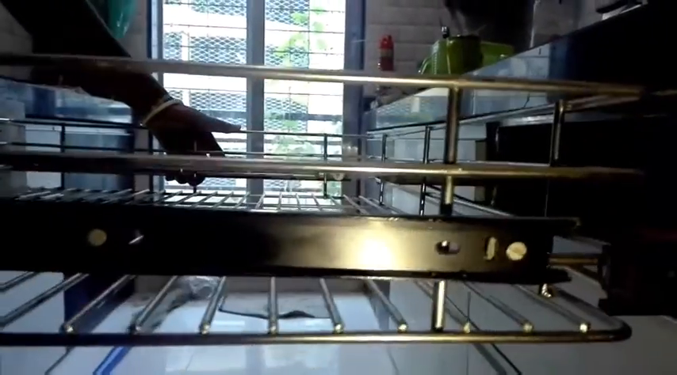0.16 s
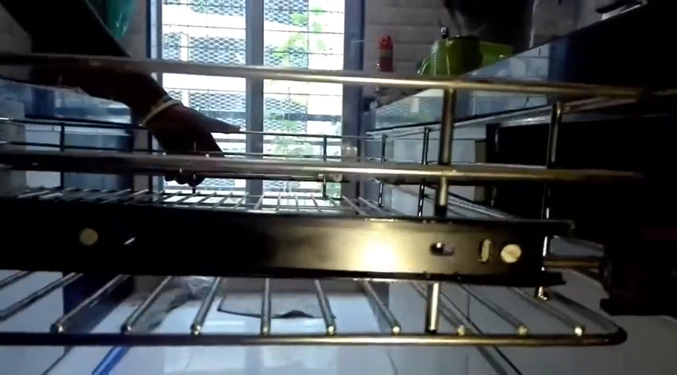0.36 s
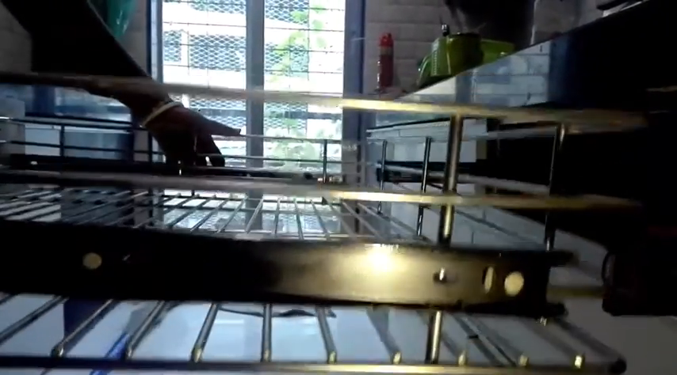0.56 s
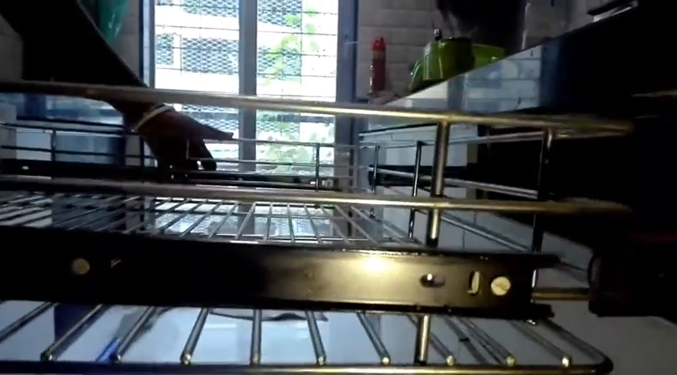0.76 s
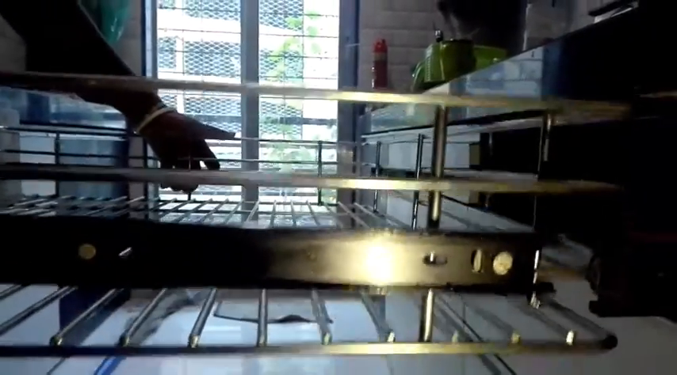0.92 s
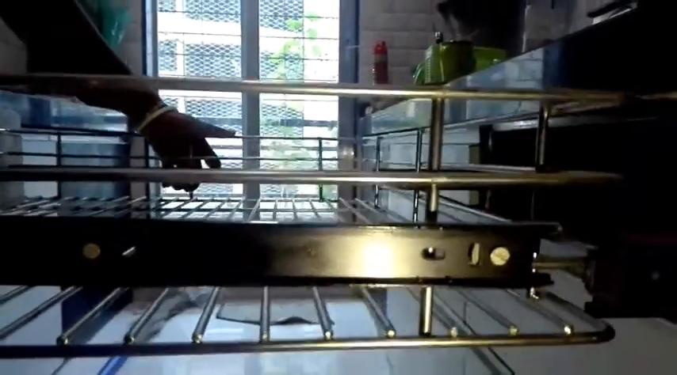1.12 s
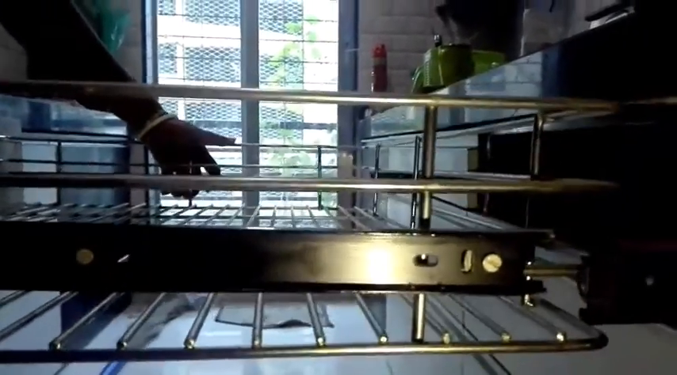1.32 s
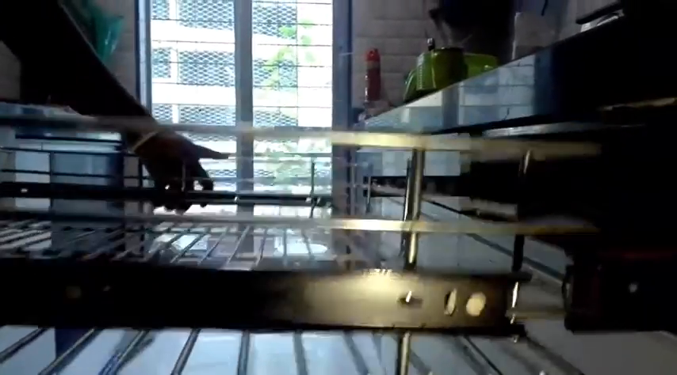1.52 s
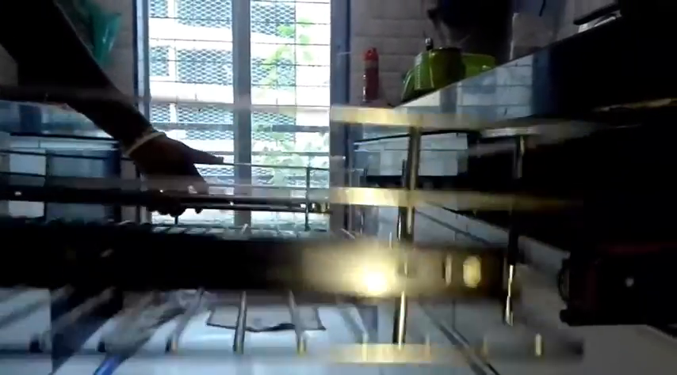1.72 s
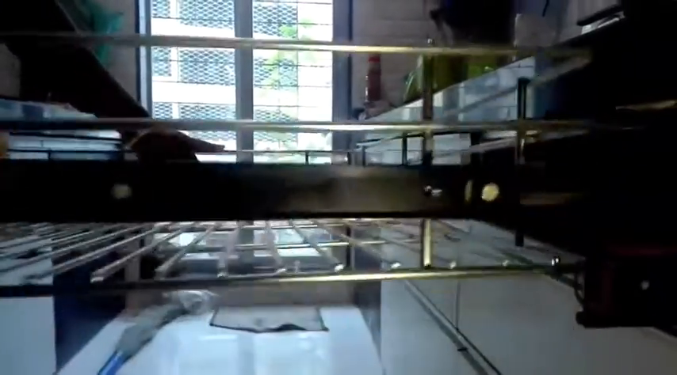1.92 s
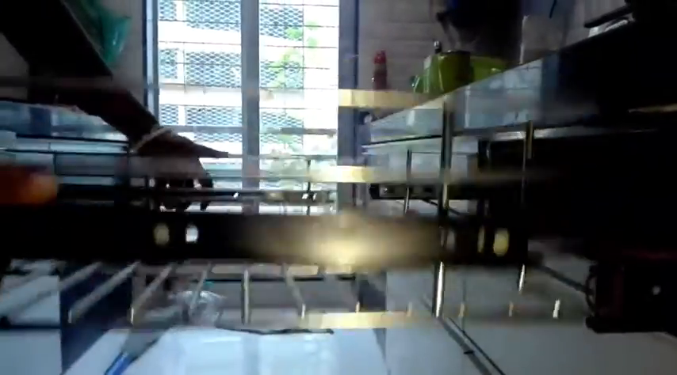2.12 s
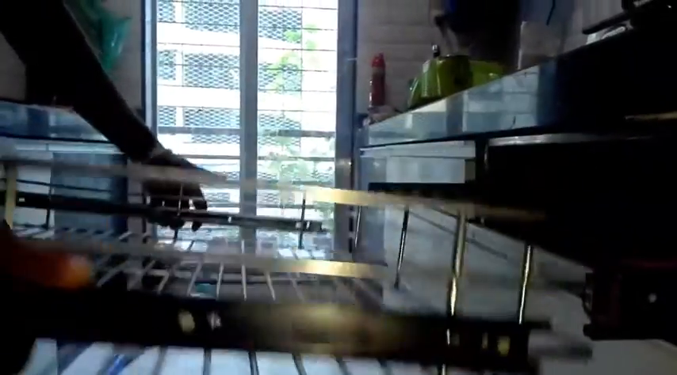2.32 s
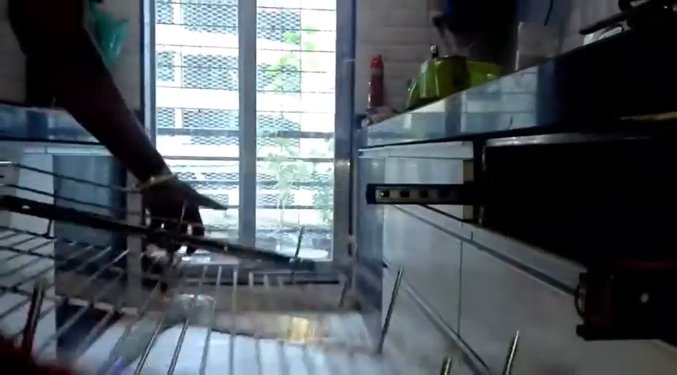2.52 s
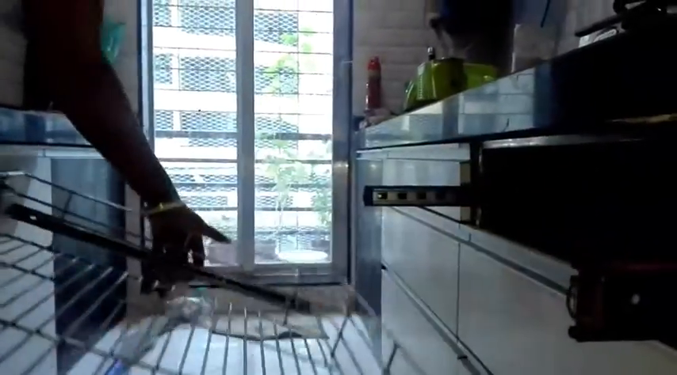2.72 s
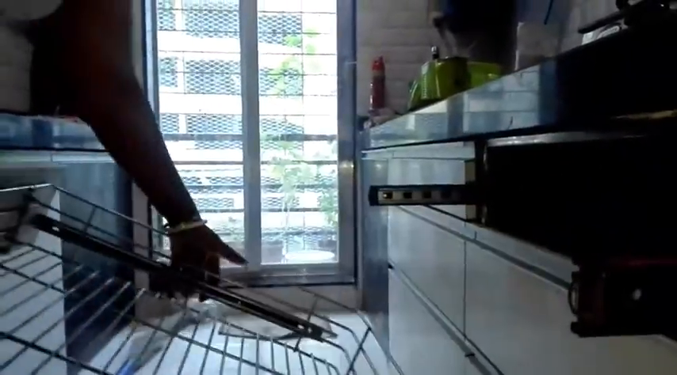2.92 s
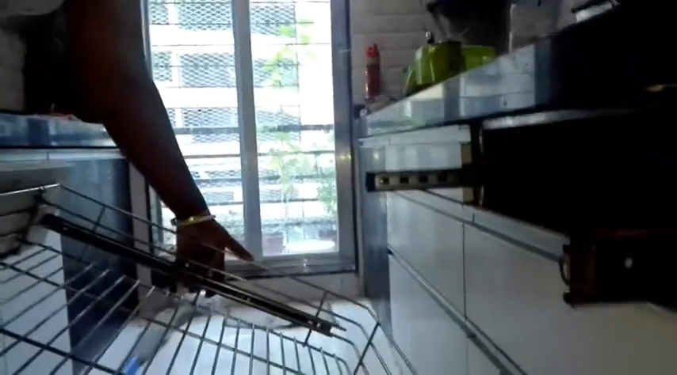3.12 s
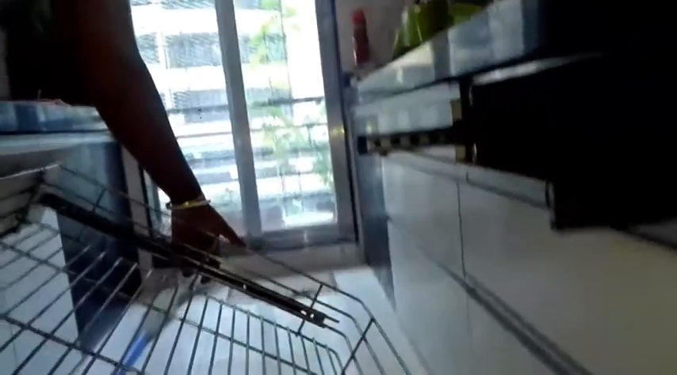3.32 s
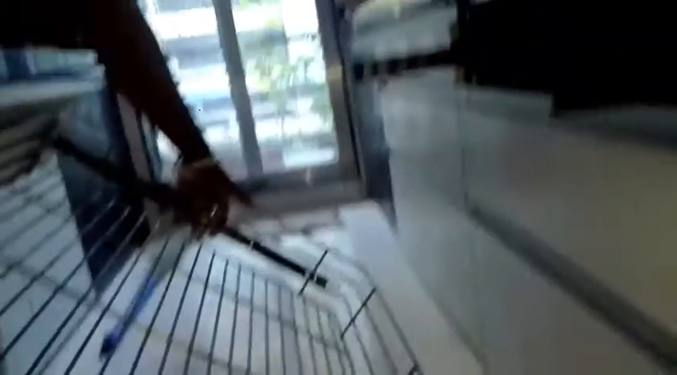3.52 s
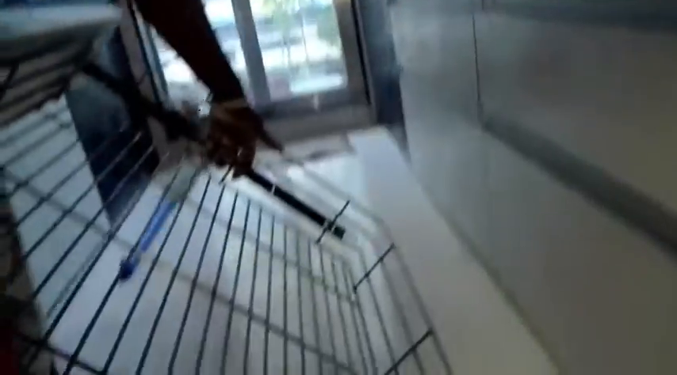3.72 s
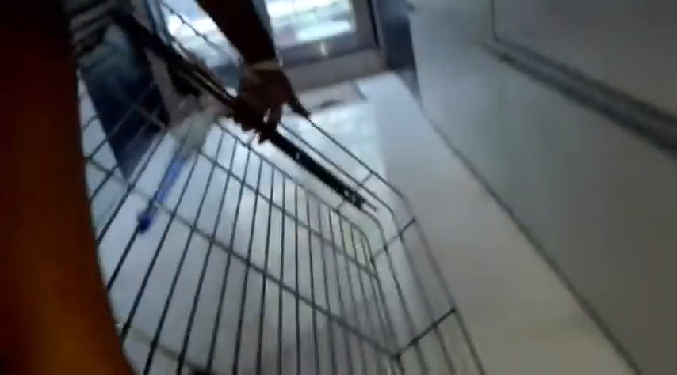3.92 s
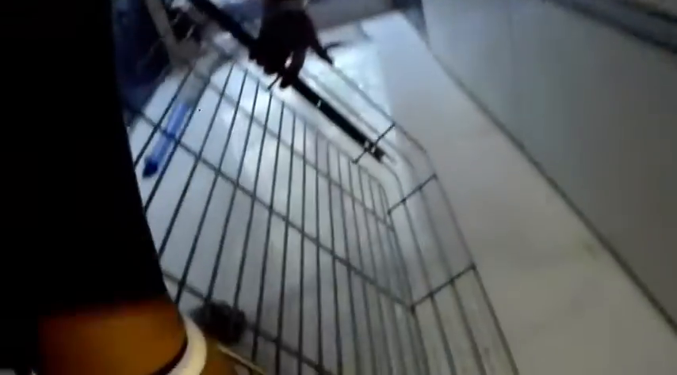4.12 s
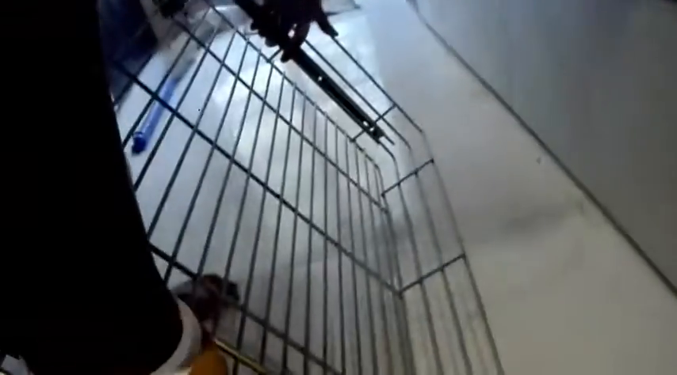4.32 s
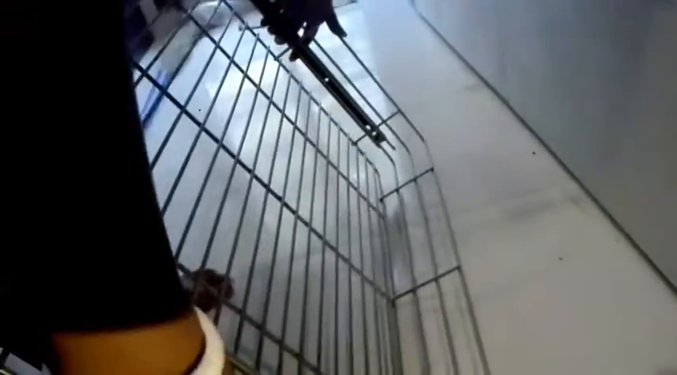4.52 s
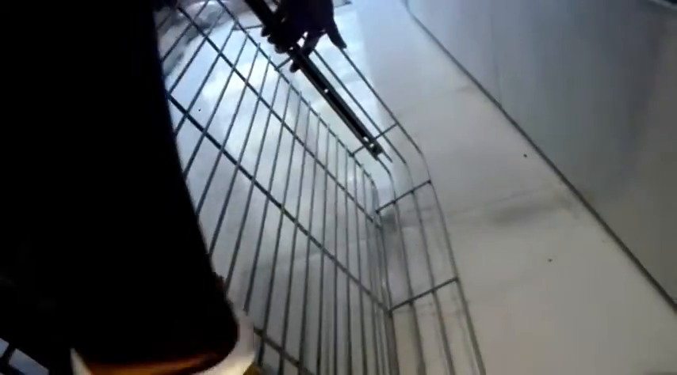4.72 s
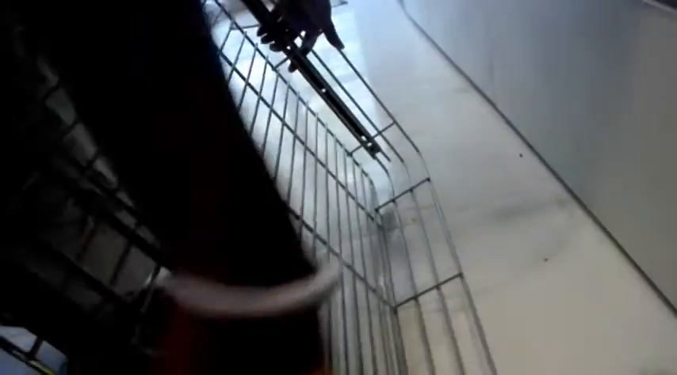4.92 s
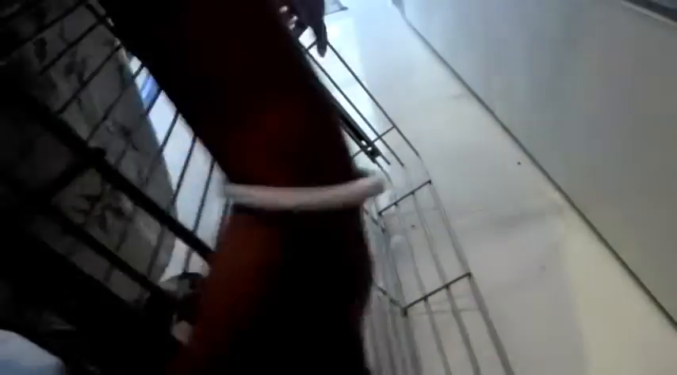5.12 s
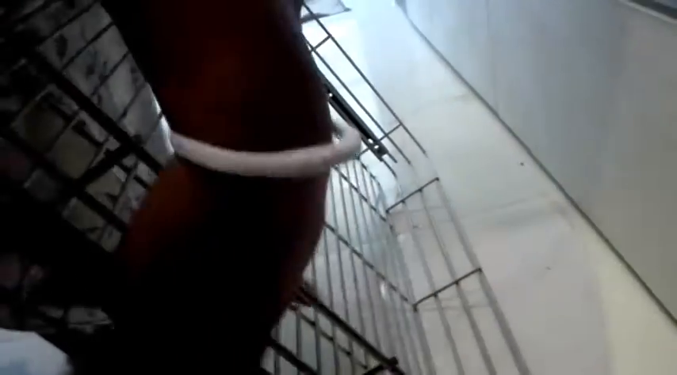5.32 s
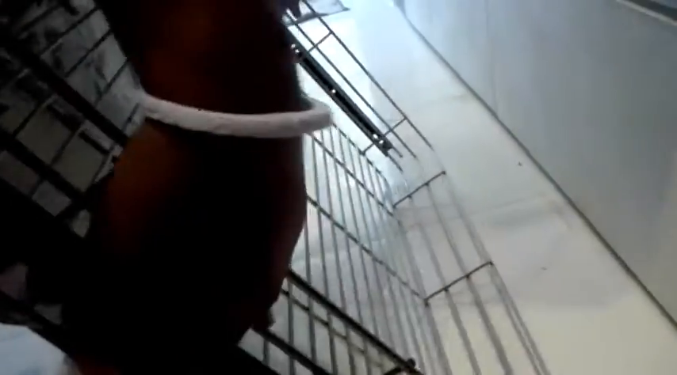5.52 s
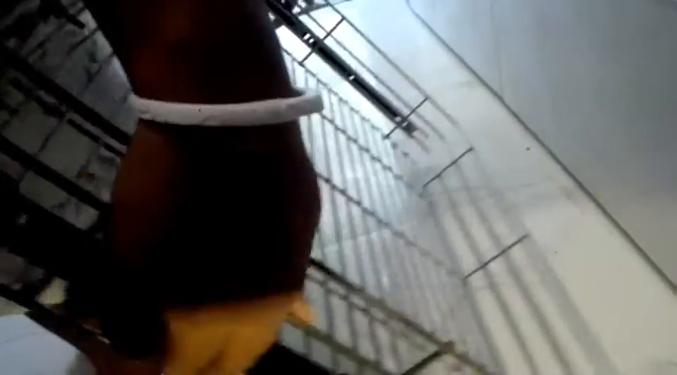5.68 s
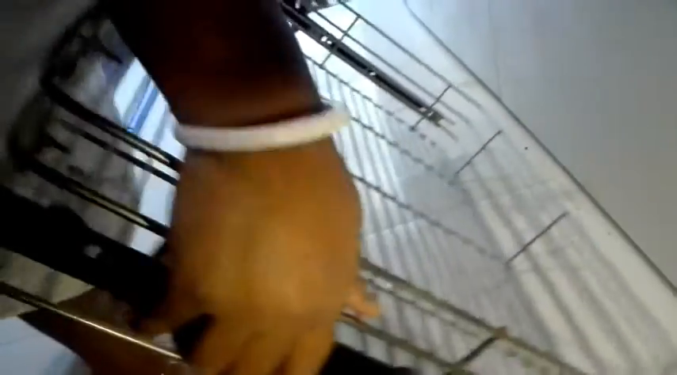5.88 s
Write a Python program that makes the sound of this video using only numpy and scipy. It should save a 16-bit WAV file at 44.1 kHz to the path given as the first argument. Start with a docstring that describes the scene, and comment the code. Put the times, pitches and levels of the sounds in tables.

```python
"""A wire basket is worked off its drawer slides, close by in a small, hard-walled kitchen.
Over steady air noise and hum, hands brush the wires. From 0.7 to 2.2 s jolts rattle the wires and
wobble the frame, catches snap, the slides bump the cabinet, slipping metal squeaks, single wires ring.
Dull taps follow as the basket is carried. At 4.6 s it lands on the floor tiles and rocks.
Near 5.9 s metal rubs on metal: a short scrape with hiss, squeal and drone."""
import sys
import numpy as np
from scipy import signal
from scipy.fft import rfft, irfft, next_fast_len
from scipy.io import wavfile
from scipy.ndimage import uniform_filter1d, map_coordinates

SR = 44100
rng = np.random.default_rng(int(sys.argv[2]) if len(sys.argv) > 2 else 0)


def dump(signal):
    """Clip the signal to [-1, 1] and save it as 16-bit WAV at the path in sys.argv[1]."""
    limited = np.clip(np.atleast_2d(signal).T, -1, 1)
    pcm = np.round(limited * 32767).astype(np.int16)
    wavfile.write(sys.argv[1], SR, pcm)


N = 262395
TIME_S = np.arange(N) / SR
AGE_S = TIME_S[:SR]  # time since an onset

# background air spectrum: freq_hz, gain_db
AIR_COLOUR = [(15, -52), (25, -5.5), (99, 0.5), (156, -11), (178, -9.5), (344, -15.5), (381, -19),
              (603, -26.5), (1110, -15), (1850, -16.5), (2100, -18.5), (2580, -24.5), (3500, -19.5),
              (4700, -25), (5150, -22.5), (5600, -27), (8750, -32), (11000, -56), (14300, -75),
              (22000, -120)]
# shifts of grip: peak_s, half_length_s, brush_db, flex_db
GRIP_SHIFTS = [(0.005, 0.066, -69.5, -49.5), (1.448, 0.1, -99, -54), (2.896, 0.081, -72, -75),
               (3.757, 0.099, -71, -60.5), (3.957, 0.046, -81.5, -54), (4.087, 0.076, -69.5, -69),
               (5.367, 0.13, -66, -56), (5.63, 0.11, -72, -63.5)]
# spectrum of skin on wire: freq_hz, gain_db
SKIN_COLOUR = [(1000, -17), (3000, -12.5), (6000, 6), (9000, 14), (11500, 8), (14500, -4)]
# frame bending modes: pitch_hz, gain_db
FRAME_MODES = [(44, -8.5), (68, -5), (92, -2), (108, -17), (127, -3), (153, -4.5), (195, -13.5),
               (263, -12.5), (325, -15)]
# jolts in the slides: start_s, rattle_db, graze_lead_s, fall_s, tilt_db_per_oct, low_mid_db,
# clang_db, clang_centre_hz, frame_db, frame_centre_hz, frame_range_oct
SLIDE_JOLTS = [(.684, -49.5, 0.0016, 0.024, 0, 15.5, -54.5, 1350, -48.5, 122, 0.37),
               (1.102, -49, 0.0012, 0.033, 0.5, 20.5, -65.5, 3300, -45.5, 147, 0.49),
               (1.672, -26, 0.0083, 0.015, 1.5, 1.5, -32, 1200, -42, 141, 0.52),
               (1.697, -31.5, 0.001, 0.028, -5, 3.5, -33, 1250, -46, 138, 0.33),
               (1.768, -45.5, 0.0002, .035, -2, 16, -52, 2795, -53, 150, 0.55),
               (1.826, -41.5, 0.0021, 0.074, -0.5, 16.5, -43.5, 1700, -50, 200, 0.78),
               (1.92, -21, .032, 0.012, 2.5, -1, -23, 2200, -35.5, 115, 0.52),
               (1.935, -26, 0.0015, 0.0083, 4.5, -19, -21, 3500, -39, 130.3, 0.37),
               (1.976, -35.5, 0, 0.046, 3.5, 20, -47, 1350, -44.5, 88, 0.3)]
# rattle spectrum in the slides: freq_hz, gain_db
HANGING_COLOUR = [(60, -7), (200, -6), (400, -3), (520, -10.5), (680, -3.5), (950, 5), (1400, 4),
                  (2300, 2.5), (3400, 3.5), (4000, -2.5), (4500, -3), (5800, -3), (8000, -7), (11000, -8.5),
                  (14500, -17)]
# wire modes in the slides: pitch_hz, gain_db, t60_s
HANGING_MODES = [(787, -7.5, 0.38), (957, -3.5, 0.18), (1019, -6, 0.21), (1200, -2.5, .28),
                 (1310, -6.5, 0.89), (1365, -3, .55), (1430, 0.5, 0.299), (1664, -8.5, .22),
                 (1784, -7.5, 0.14), (2097, -4.5, 0.1583), (2270, -3, .18), (2606, 7, 0.14),
                 (2850, -1, .12), (3026, 7, 0.15), (3253, 2, 0.18), (3520, 1, 0.142), (3580, 1, 0.12),
                 (3893, 5.5, .11), (4650, -3, 0.099), (5007, -1.5, 0.13), (5800, -1.5, 0.15),
                 (6150, -1, .14), (6250, 0, .12), (7420, -9, 0.15), (11300, -5, .12)]
# catches letting go: start_s, level_db, fall_s, tilt_db_per_oct, ring_vs_crack_db, ring_shift_oct
CATCH_SNAPS = [(.702, -43, 0.0045, 9, 8, -0.0088), (1.1087, -30.5, 0.0032, 3.5, -4, -0.034),
               (1.6604, -12, 0.0028, 1, -22.5, -0.043), (1.8999, -15.5, 0.0037, -8, -3.5, -0.099),
               (1.9239, -16, 0.00097, -12, -18, -.13)]
# crack spectrum: freq_hz, gain_db
CRACK_COLOUR = [(200, -43.5), (1500, -46), (2800, -12), (4000, 5.5), (6000, 7), (9000, 2), (11500, -1.5),
                (14500, -6.5)]
# steel rail modes: pitch_hz, gain_db, t60_s
RAIL_MODES = [(4436, -11.5, .15), (5100, -4.5, 0.2), (5800, -13, 0.131), (6390, 0.5, 0.15), (6680, 6, 0.18),
              (6780, 3, 0.25), (8400, -15.5, 0.25), (9600, -3, 0.2), (10500, -2, 0.16), (11060, -0.5, 0.15),
              (12350, -4.5, .1), (14300, -8.5, 0.09)]
# slides hitting the cabinet: start_s, level_db, centre_hz
CABINET_BUMPS = [(.705, -53, 930), (.74, -49.5, 315), (1.113, -43, 950), (1.118, -51, 420),
                 (1.2, -52.5, 270), (1.668, -39, 700), (1.688, -29.5, 265), (1.71, -35.5, 400),
                 (1.828, -42.5, 950), (1.85, -42.5, 400), (1.904, -28, 950), (1.921, -23.5, 419),
                 (1.975, -40, 720), (2.034, -36, 250)]
# cabinet panel modes: pitch_hz, gain_db, t60_s
PANEL_MODES = [(265.6, -1.5, 0.18), (322.5, -7.5, 0.15), (394, 1.5, 0.18), (610, -11.5, .07),
               (792, -11.5, .12), (947, 1.5, 0.1306), (990, -7, 0.075)]
# stick-slip squeaks: start_s, length_s, level_db, pitch_hz, glide_oct
WIRE_SQUEAKS = [(1.653, 0.0048, -32.5, 5600, -0.34), (1.656, 0.0076, -34, 4100, -0.33),
                (1.958, 0.0079, -55, 870, -0.037), (4.819, 0.023, -48, 3800, -0.0063),
                (4.819, 0.009, -42, 7150, -0.011), (4.8188, 0.015, -35.5, 8840, 0.021),
                (4.8185, 0.014, -34.5, 10500, 0.047), (4.819, 0.0081, -43, 11450, 0.013)]
# single wires struck: start_s, level_db, centre_hz
WIRE_PINGS = [(1.68, -33.5, 3200), (1.684, -38, 1320), (1.836, -49, 3050), (1.924, -25.5, 3150),
              (1.927, -35, 1420), (1.934, -23, 3680), (1.984, -38, 1707), (1.99, -38, 3250),
              (2.089, -44, 1330), (2.1, -49, 3230), (2.19, -50, 1170), (4.643, -32.5, 3653),
              (4.842, -26.5, 3230), (4.844, -32.5, 900), (4.856, -31.5, 1790), (4.872, -28, 3530),
              (4.978, -42, 1400), (4.984, -34.5, 1830)]
# taps while carried: start_s, level_db, swell_s, centre_hz
CARRY_TAPS = [(2.578, -54.5, 0.011, 1780), (3.366, -51, 0.014, 1640), (3.941, -63, 0.011, 3000),
              (4.088, -64, 0.033, 1850)]
# landing and rocking on tiles: columns as SLIDE_JOLTS
FLOOR_KNOCKS = [(4.639, -36, 0.0009, 0.031, 0.5, -4.5, -40, 1350, -47.5, 144, 0.5),
                (4.84, -25.5, 0.00091, 0.019, 3, 3, -36, 2700, -36.5, 144, 0.57),
                (4.86, -33.5, 0, 0.031, -1, -8, -30.5, 2400, -35.5, 147, 0.4),
                (4.924, -40.5, 0.00016, 0.013, 1, -9, -44, 1500, -49, 256, 0.3),
                (4.972, -37, 0.0033, 0.03, -4.5, 2, -41.5, 1500, -47.5, 91.5, 0.44),
                (5.11, -52.5, 0.0018, 0.063, -7, 15, -51, 1400, -60.5, 96, 0.27)]
# rattle spectrum on the floor: freq_hz, gain_db
FLOOR_COLOUR = [(60, -2), (200, -4), (310, -12), (430, -3), (560, -6), (740, -2), (880, -5.5), (1080, 1),
                (1400, 4.5), (1900, 1.5), (2600, -2.5), (3500, 2), (4300, 0), (5000, -2.5), (7100, -7),
                (10500, -9), (14500, -30)]
# wire modes of the free basket: pitch_hz, gain_db, t60_s
FREE_MODES = [(899, -3, 0.14), (1225, -3, .25), (1314, 2, .36), (1408, 0, 0.3), (1530, 0.5, 0.32),
              (1663, -7.5, 0.18), (1786, 4, .3), (2117, -1.5, 0.5), (2300, 4.5, 0.24), (3186, 4.5, 0.13),
              (3285, 4, .16), (3510, 8, 0.15), (3530, 6.5, 0.14), (3690, 7, 0.15), (4190, 1, 0.28),
              (5660, -13, .2), (6960, 3.5, 0.12), (7090, 5, 0.12), (8600, -10, .16), (10500, -1, .12)]
# scrape hiss spectrum: freq_hz, gain_db
HISS_COLOUR = [(600, -69), (1300, -3), (2000, -0.5), (2500, -7), (3100, 7.5), (4200, 1), (5400, 10.5),
               (6600, -0.5), (8500, 3), (10200, 4), (12300, 7), (14500, -4)]
# wires squealing in the scrape: pitch_hz, width_hz, level_db, pressure_exponent
WIRE_SQUEALS = [(3560, 38, -49.5, .2), (3452, 79, -49, 0.43), (4990, 110, -59, 0.52), (5520, 200, -56, 0.7),
                (7400, 62, -62, 0.9), (8500, 220, -60, .8)]
# kitchen decay: freq_hz, t60_s
KITCHEN_DECAY = [(100, 1), (500, 0.67), (1300, 0.52), (3000, 0.17), (7000, 0.3), (10000, 0.22),
                 (12000, 0.18)]
# width of diffuse sound: freq_hz, side_vs_mid_db
STEREO_WIDTH = [(25, -5.5), (60, -22.5), (400, -13.5), (1300, -14), (2400, -13.5), (4400, -12),
                (8000, -4.5), (14000, -5.5)]
# microphone housing notches: centre_hz, width_oct, gain_db
HOUSING_DIPS = [(506, 0.2435, -2), (2410, 0.078, -1.5), (4207, 0.2, -2.5)]


def undb(db):
    """Decibels to gain."""
    return 10 ** (np.asarray(db) / 20)


def unit_rms(x):
    """Scale to rms 1."""
    return x / np.sqrt(np.mean(x ** 2))


def unit_energy(x):
    """Scale to mean energy 1 per channel."""
    return x / np.sqrt(np.mean(np.sum(x ** 2, axis=-1)))


def bins_hz(size):
    """FFT bin frequencies, floored at 1 Hz."""
    return np.maximum(np.fft.rfftfreq(size, 1 / SR), 1)


def curve(points, hz):
    """Interpolate (freq_hz, value) rows over log frequency."""
    freq_hz, value = np.transpose(points)
    return np.interp(np.log(hz), np.log(freq_hz), value)


def band_db(hz, centre_hz, range_oct):
    """Flat-topped band, 3 dB down at range_oct either side."""
    return -10 * np.log10(1 + (np.log2(hz / centre_hz) / range_oct) ** 4)


def response(db_at, size=8192):
    """Minimum-phase, unit-energy impulse response for a dB curve."""
    cepstrum = irfft(np.log(undb(db_at(bins_hz(size)))))
    cepstrum[1:size // 2] *= 2
    cepstrum[size // 2 + 1:] = 0
    return unit_energy(irfft(np.exp(rfft(cepstrum))))


def through(x, impulse):
    """Convolve, keeping the length of x."""
    return signal.fftconvolve(np.atleast_2d(x), np.atleast_2d(impulse), axes=-1)[:, :np.shape(x)[-1]]


def coloured(x, colour):
    """Filter by a (freq_hz, gain_db) table."""
    return through(x, response(lambda hz: curve(colour, hz)))


def spread(mid, side):
    """Mid and side to stereo; width varies with frequency."""
    size = next_fast_len(len(side))
    side = irfft(rfft(side, size) * undb(curve(STEREO_WIDTH, bins_hz(size))), size)[:len(mid)]
    return np.array([mid + side, mid - side])


def add(out, start_s, x):
    """Mix x into out from start_s."""
    start = max(int(start_s * SR), 0)
    out[:, start:start + x.shape[-1]] += x[..., :N - start]


def wander(steps):
    """Random curve with a new Gaussian value at each whole step."""
    return np.interp(steps, np.arange(256), rng.standard_normal(256))


def bell(peak_s, half_length_s):
    """Gaussian swell, peak 1."""
    return np.exp(-((TIME_S - peak_s) / half_length_s) ** 2)


def contacts(size, grain_db, hold_samples=24):
    """Dense tiny collisions: stereo noise whose strength scatters by grain_db."""
    strength = undb(grain_db * rng.standard_normal(size // hold_samples + 1))
    strength = np.repeat(strength, hold_samples)[:size]
    return spread(*unit_rms(strength * rng.standard_normal((2, size))))


def background(air_db=-58, hum_hz=153, hum_db=-66.5):
    """Steady air noise from the flat and window; a faint wavering hum."""
    air = unit_rms(coloured(spread(*rng.standard_normal((2, N))), AIR_COLOUR))
    hum = undb(hum_db + 2.5 * wander(4 * TIME_S)) * np.sin(2 * np.pi * hum_hz * TIME_S)
    flicker_db = .5 * wander(8.8 * TIME_S) + .5 * wander(22 * TIME_S)
    return undb(air_db + flicker_db) * air + hum


def frame(age_s, envelope, centre_hz, range_oct, thud_db=-7, thud_top_hz=330):
    """One band of the frame's bending modes plus a dull thud, each under envelope(hz)."""
    mode_hz, mode_db = np.transpose(FRAME_MODES)
    gain = np.sqrt(2) * unit_energy(undb(mode_db + band_db(mode_hz, centre_hz, range_oct)))
    swings = envelope(mode_hz[:, None]) * np.exp(2j * np.pi * mode_hz[:, None] * age_s)
    phases = np.exp(2j * np.pi * rng.random((2, len(FRAME_MODES))))
    dull = response(lambda hz: 2 * band_db(hz, centre_hz, range_oct)
                    - 20 * np.log10(1 + (hz / thud_top_hz) ** 4))
    thud = envelope(centre_hz) * through(rng.standard_normal((2, len(age_s))), dull)
    return ((gain * phases) @ swings).imag + undb(thud_db) * thud


def handling():
    """Each shift of grip brushes skin over wire and flexes the frame."""
    brush = sum(undb(db) * bell(peak_s, half_s) for peak_s, half_s, db, _ in GRIP_SHIFTS)
    flex = sum(undb(db) * bell(peak_s, half_s) for peak_s, half_s, _, db in GRIP_SHIFTS)
    swish = coloured(contacts(N, grain_db=4), SKIN_COLOUR)
    return brush * swish + spread(*frame(TIME_S, lambda hz: flex, centre_hz=101.4, range_oct=0.57))


def ring(modes, detune_ratio, scatter_db, count):
    """Near-equal parts split each mode into close tones that start in phase and drift apart."""
    hz, db, t60_s = np.transpose(modes)[:, :, None]
    weight, offset, phase = np.moveaxis(rng.standard_normal((len(modes), 3, count)), 1, 0)
    gain = (undb(db + scatter_db * weight) * np.exp(1j * np.pi * phase[:, :1])).ravel()
    tone_hz = hz * (1 + detune_ratio * (offset - offset.mean(axis=1, keepdims=True)))
    pole = (2j * np.pi * tone_hz - np.log(1000) / t60_s).ravel()
    block = int(np.ceil(np.sqrt(SR)))
    block_starts = gain * np.exp(np.outer(AGE_S[::block], pole))
    within_block = np.exp(np.outer(pole, AGE_S[:block]))
    return (block_starts @ within_block).imag.ravel()[:SR]


def strike(modes, centre_hz, range_oct, rise_s):
    """One firm contact rings the modes near centre_hz, in stereo."""
    hz, db, t60_s = np.transpose(modes)
    count = 4
    gain = unit_energy(undb(db + band_db(hz, centre_hz, range_oct))) / count
    struck = np.column_stack([hz, 20 * np.log10(gain), t60_s])
    tones = np.array([ring(struck, detune_ratio=0.0043, scatter_db=-1, count=count) for _ in range(2)])
    return spread(*tones * (1 - np.exp(-AGE_S / rise_s)))


def flexed(x, depth_ratio=.006, step_s=.009, fall_s=.13):
    """Metal bends after a blow: pitch wavers, then steadies."""
    stretch = depth_ratio * np.exp(-AGE_S / fall_s) * wander(AGE_S / step_s)
    return np.array([map_coordinates(channel, [np.cumsum(1 + stretch)]) for channel in x])


def rattles(blows, colour, modes, ring_db, detune_ratio, settle_db, settle_fall_s):
    """At a blow the wires graze brightly, clash and clang, then settle in a softer, duller rattle."""
    def flurry(rise_s, fall_s, tilt_db_per_oct, low_mid_db, knee_hz=2500, low_mid_hz=750):
        """A burst of contacts through body and wires, rms near 1 at its peak."""
        envelope = np.minimum(AGE_S / rise_s, 1) * np.exp(-np.maximum(AGE_S - rise_s, 0) / fall_s)
        hits = envelope * contacts(SR, grain_db=2.5, hold_samples=48)
        hardness = response(lambda hz: tilt_db_per_oct * np.log2(1 + (hz / knee_hz) ** 2) / 2
                            + low_mid_db / (1 + (hz / low_mid_hz) ** 4))
        wires = flexed(through(hits, unit_energy(ring(modes, detune_ratio, scatter_db=0, count=5))))
        basket = coloured(hits, colour) + undb(ring_db) * wires
        return unit_energy(through(basket, hardness)) * np.linalg.norm(envelope)

    out = np.zeros((2, N))
    graze_db, graze_fall_s, graze_db_per_oct = -1, 0.0038, 7.5
    clash_rise_s, settle_rise_s, settle_db_per_oct = 0.0086, 0.078, -5.5
    for start_s, db, lead_s, fall_s, tilt_db_per_oct, low_mid_db, clang_db, clang_hz, *_ in blows:
        if lead_s > 0:
            graze = flurry(lead_s / 2, graze_fall_s + lead_s / 2, tilt_db_per_oct + graze_db_per_oct, 0)
            add(out, start_s - lead_s, undb(db + graze_db) * graze)
        clash = flurry(clash_rise_s, fall_s, tilt_db_per_oct, low_mid_db)
        clang = flexed(strike(modes, clang_hz, range_oct=0.57, rise_s=0.0032))
        settle = flurry(settle_rise_s, settle_fall_s, tilt_db_per_oct + settle_db_per_oct, low_mid_db)
        add(out, start_s, undb(db) * clash + undb(clang_db) * clang + undb(db + settle_db) * settle)
    return out


def wobbles(blows, cycles_at_0_db, sharpness, cycles_per_db=0.15):
    """The frame swings up and dies away; high modes and harder blows peak sooner."""
    out = np.zeros((2, N))
    for start_s, rattle_db, *_, frame_db, centre_hz, range_oct in blows:
        cycles = max(cycles_at_0_db - cycles_per_db * rattle_db, 1)
        swell = lambda hz: (AGE_S * hz / cycles * np.exp(1 - AGE_S * hz / cycles)) ** sharpness
        add(out, start_s, undb(frame_db) * frame(AGE_S, swell, centre_hz, range_oct))
    return spread(*out)


def snaps(chatter_db=-4, chatter_fall_s=0.037, knee_hz=2000):
    """A catch lets go with a crack; the rail rings and its ball bearings chatter."""
    out = np.zeros((2, N))
    for start_s, db, fall_s, tilt_db_per_oct, ring_db, shift_oct in CATCH_SNAPS:
        push = np.exp(-AGE_S / fall_s)
        hardness = response(lambda hz: curve(CRACK_COLOUR, hz)
                            + tilt_db_per_oct * np.log2(np.maximum(hz / knee_hz, 1)))
        crack = unit_energy(through(push * rng.standard_normal(SR), hardness))
        modes = [(hz * 2 ** shift_oct, mode_db, t60_s) for hz, mode_db, t60_s in RAIL_MODES]
        tones = [ring(modes, detune_ratio=.018, scatter_db=2, count=14) for _ in range(2)]
        rail = unit_energy(flexed(spread(*tones)))
        bearings = np.exp(-AGE_S / chatter_fall_s) * contacts(SR, grain_db=6)
        chatter = unit_energy(through(bearings, hardness))
        snap = crack + undb(ring_db) * (rail + undb(chatter_db) * chatter)
        add(out, start_s, undb(db) * np.linalg.norm(push) * snap)
    return out


def bumps(rise_cycles=4):
    """The slides hit the cabinet; its panels knock hollowly."""
    out = np.zeros((2, N))
    for start_s, db, centre_hz in CABINET_BUMPS:
        knock = strike(PANEL_MODES, centre_hz, range_oct=0.32, rise_s=rise_cycles / centre_hz)
        add(out, start_s, undb(db) * knock)
    return out


def rough_tone(pitch_hz, jitter_hz, size, smooth_samples):
    """Sine with random pitch jitter, jitter_hz rms."""
    jitter = unit_rms(uniform_filter1d(rng.standard_normal(size), smooth_samples))
    return np.sin(2 * np.pi * np.cumsum(pitch_hz + jitter_hz * jitter) / SR)


def squeaks(rise_s=0.00029):
    """A wire sticks and slips for milliseconds as it meets or leaves a surface."""
    out = np.zeros((2, N))
    for start_s, length_s, db, hz, glide_oct in WIRE_SQUEAKS:
        pitch_hz = hz * 2 ** (glide_oct * np.minimum(AGE_S / length_s, 1))
        tone = np.sqrt(2) * rough_tone(pitch_hz, jitter_hz=200, size=SR, smooth_samples=30)
        envelope = np.minimum(AGE_S / rise_s, 1) / (1 + (AGE_S / length_s) ** 8)
        add(out, start_s, undb(db) * envelope * tone)
    return out


def pings(free_from_s=3):
    """Single struck wires ring out in a few neighbouring modes."""
    out = np.zeros((2, N))
    for start_s, db, centre_hz in WIRE_PINGS:
        modes = HANGING_MODES if start_s < free_from_s else FREE_MODES
        add(out, start_s, undb(db) * strike(modes, centre_hz, range_oct=.13, rise_s=.0015))
    return out


def taps():
    """The hand taps the frame; each tap sounds in one damped band."""
    out = np.zeros((2, N))
    for start_s, db, swell_s, centre_hz in CARRY_TAPS:
        band = response(lambda hz: band_db(hz, centre_hz, range_oct=0.28))
        envelope = AGE_S / swell_s * np.exp(1 - AGE_S / swell_s)
        add(out, start_s, undb(db) * through(envelope * spread(*rng.standard_normal((2, SR))), band))
    return out


def scrape(hiss_db=-42.5, drone_db=-56, drone_exponent=0.37):
    """One swell of pressure: sliding metal hisses, uneven slips make wires squeal, the frame drones."""
    pressure = bell(peak_s=5.893, half_length_s=0.048)
    hiss = coloured(contacts(N, grain_db=0), HISS_COLOUR)
    slips = contacts(N, grain_db=3.5)
    squeal = np.zeros((2, N))
    for hz, width_hz, db, exponent in WIRE_SQUEALS:
        wire = unit_energy(np.sin(2 * np.pi * hz * AGE_S) * AGE_S * np.exp(-np.pi * width_hz * AGE_S))
        squeal += undb(db) * pressure ** exponent * through(slips, wire)
    drone = unit_rms(rough_tone(pitch_hz=394, jitter_hz=12, size=N, smooth_samples=120))
    return undb(hiss_db) * pressure * hiss + squeal + undb(drone_db) * pressure ** drone_exponent * drone


def kitchen(x, build_s=0.00185):
    """Tiles and cupboard fronts reflect a dense tail; treble dies first."""
    noise = rfft(spread(*rng.standard_normal((2, SR))))
    centres_hz, t60s_s = np.transpose(KITCHEN_DECAY)
    tail = np.zeros((2, SR))
    for selector, t60_s in zip(np.eye(len(centres_hz)), t60s_s):
        band = np.interp(np.log(bins_hz(SR)), np.log(centres_hz), selector)
        tail += irfft(noise * band) * np.exp(-np.log(1000) * AGE_S / t60_s)
    return through(x, unit_energy(tail * (1 - np.exp(-AGE_S / build_s))))


def scene():
    """Direct sound, reverb and background; the floor knocks send more to the room than the jolts."""
    catches, slips, rubbing = snaps(), squeaks(), scrape()
    hand_taps, panels, wires = taps(), bumps(), pings()
    in_slides = rattles(SLIDE_JOLTS, HANGING_COLOUR, HANGING_MODES,
                        ring_db=-7.5, detune_ratio=0.0056, settle_db=-22, settle_fall_s=0.058)
    on_floor = rattles(FLOOR_KNOCKS, FLOOR_COLOUR, FREE_MODES,
                       ring_db=-4.5, detune_ratio=0.0048, settle_db=-12, settle_fall_s=0.047)
    swings = wobbles(SLIDE_JOLTS, cycles_at_0_db=6.14, sharpness=3)
    swings += wobbles(FLOOR_KNOCKS, cycles_at_0_db=1.5, sharpness=1.15)
    direct = handling() + in_slides + swings + catches + panels + slips + wires
    direct += hand_taps + on_floor + rubbing
    send = (undb(-7.5) * (in_slides + hand_taps) + undb(-4.5) * catches + undb(-11.5) * panels
            + undb(-1.5) * (slips + rubbing) + undb(-8.5) * wires + undb(-2) * on_floor)
    return direct + kitchen(send.mean(axis=0)) + background()


def record(dry):
    """The microphone housing notches a few bands; the recorder cuts the top."""
    housing = response(lambda hz: sum(db * np.exp(-(np.log2(hz / centre_hz) / width_oct) ** 2)
                                      for centre_hz, width_oct, db in HOUSING_DIPS))
    top_hz = 14400
    lowpass = signal.ellip(10, .2, 80, top_hz, fs=SR, output="sos")
    return signal.sosfilt(lowpass, through(dry, housing))


dry = scene()
out = record(dry)
dump(out)
```